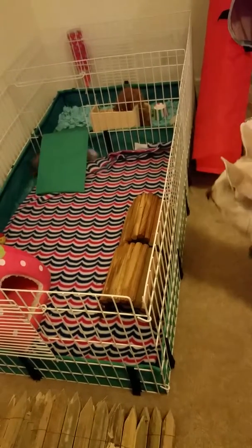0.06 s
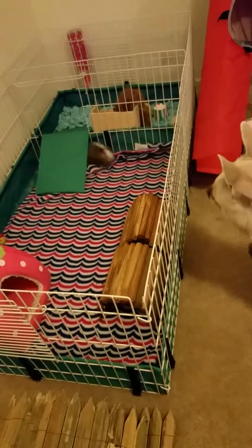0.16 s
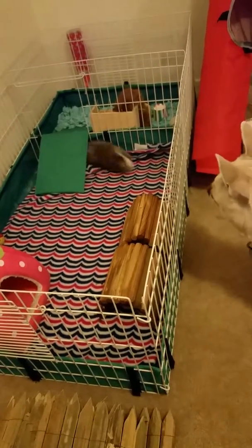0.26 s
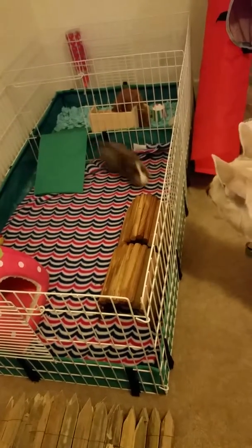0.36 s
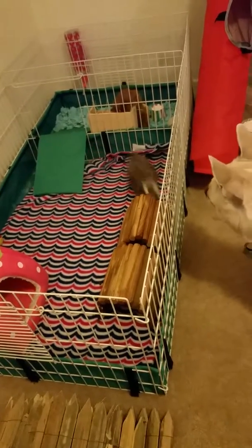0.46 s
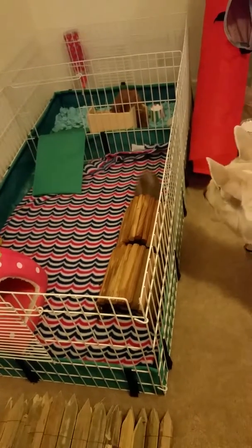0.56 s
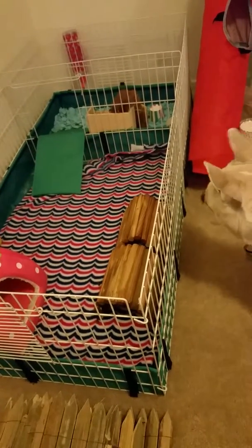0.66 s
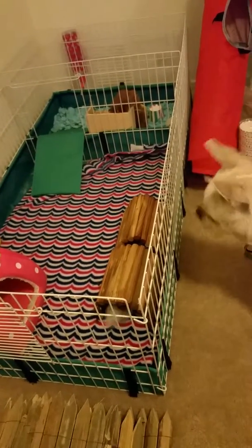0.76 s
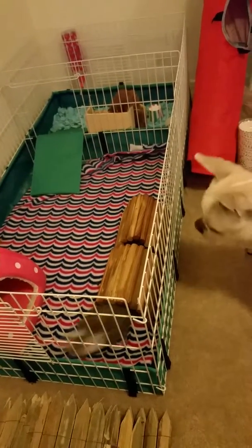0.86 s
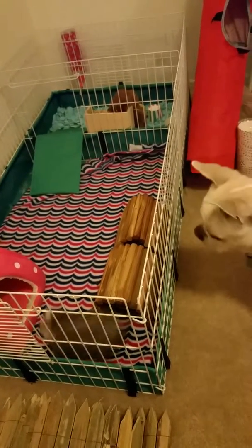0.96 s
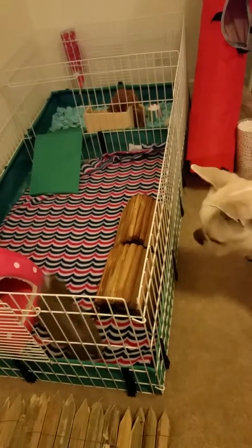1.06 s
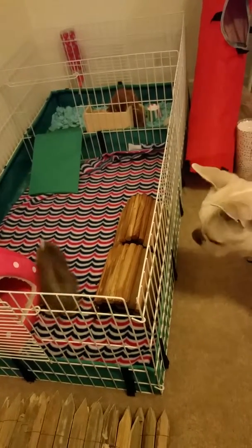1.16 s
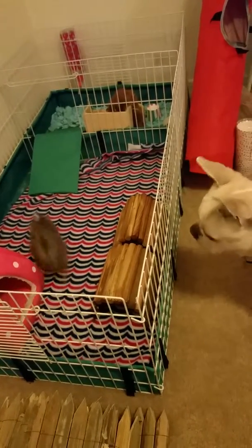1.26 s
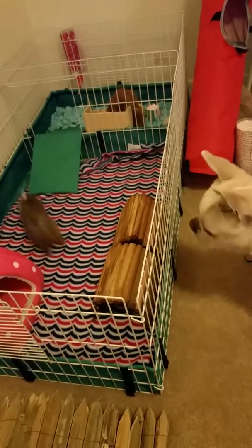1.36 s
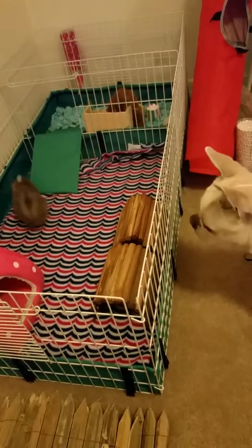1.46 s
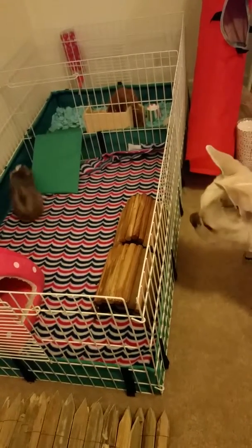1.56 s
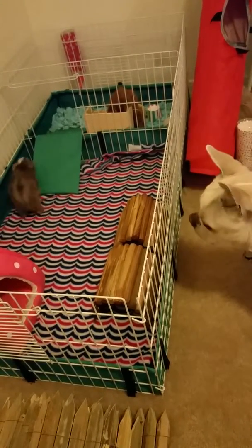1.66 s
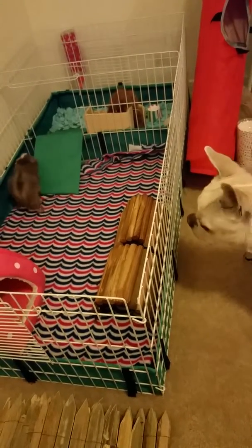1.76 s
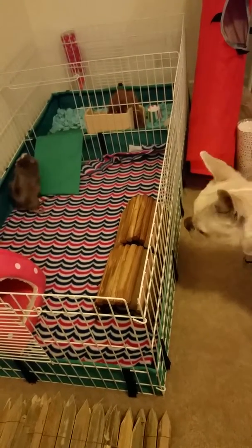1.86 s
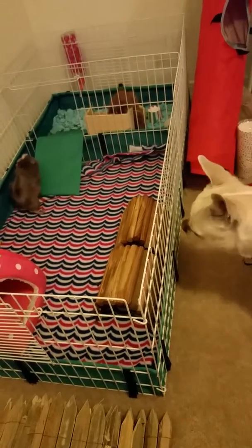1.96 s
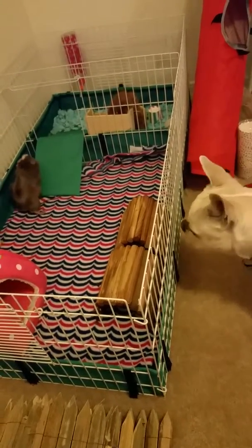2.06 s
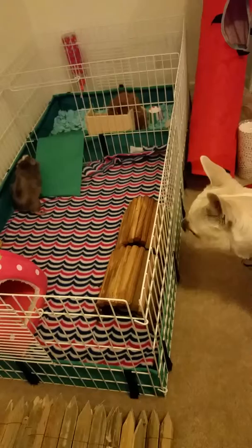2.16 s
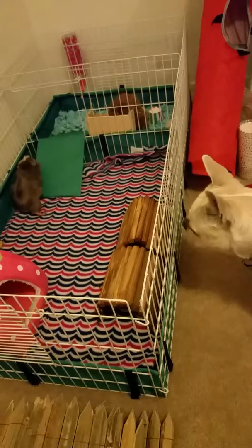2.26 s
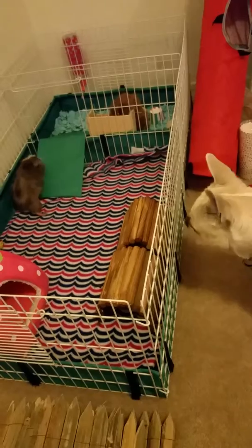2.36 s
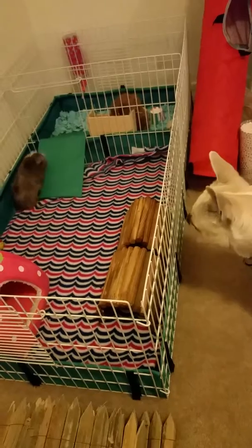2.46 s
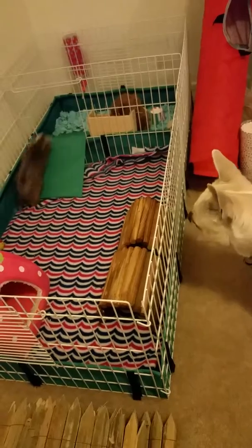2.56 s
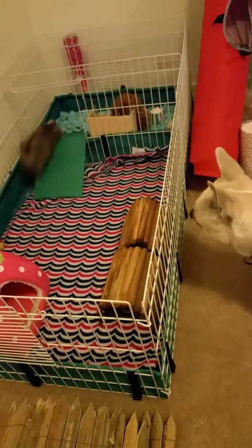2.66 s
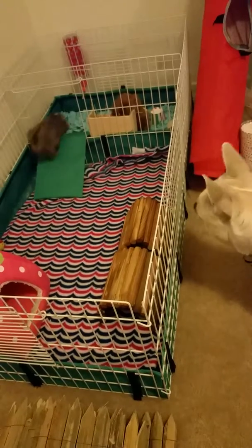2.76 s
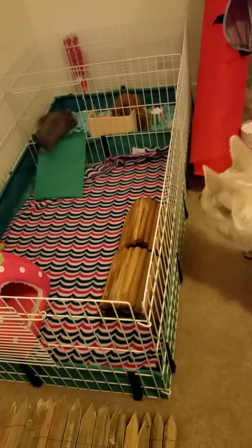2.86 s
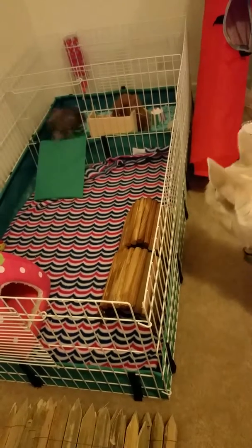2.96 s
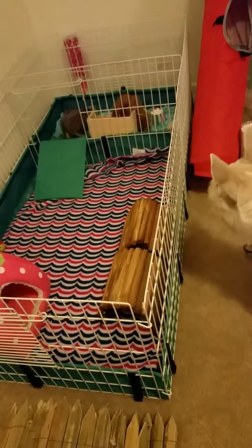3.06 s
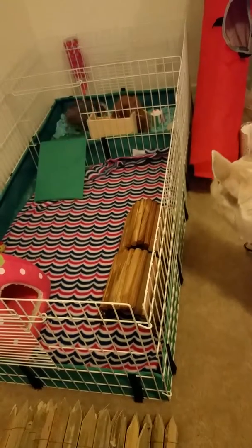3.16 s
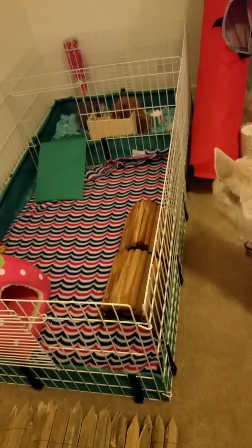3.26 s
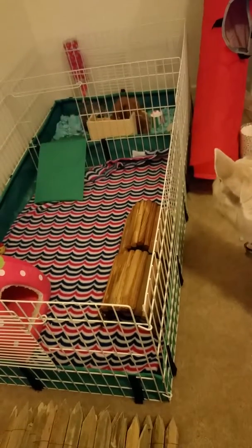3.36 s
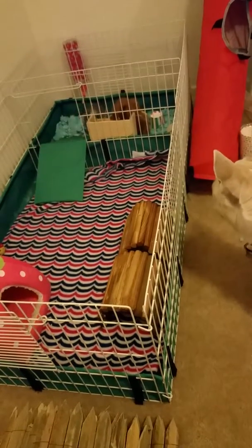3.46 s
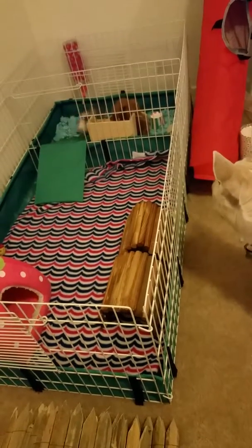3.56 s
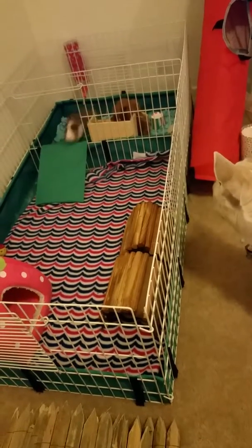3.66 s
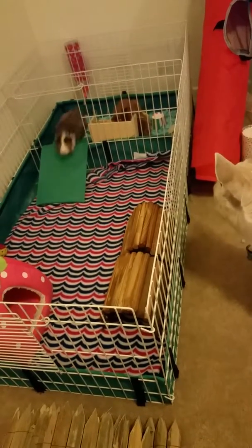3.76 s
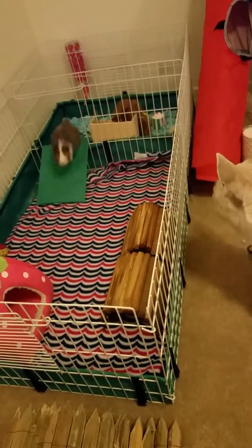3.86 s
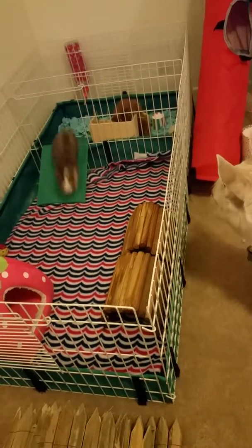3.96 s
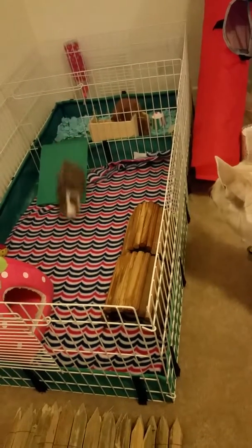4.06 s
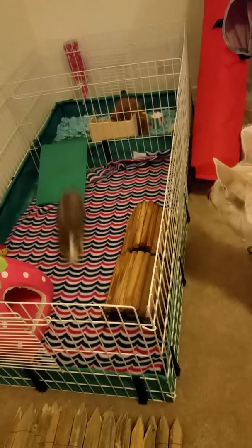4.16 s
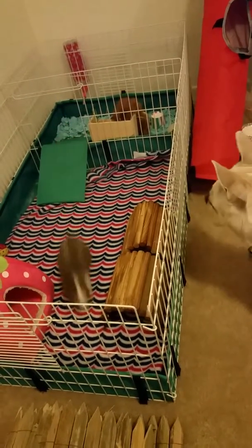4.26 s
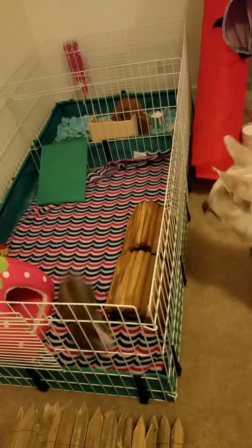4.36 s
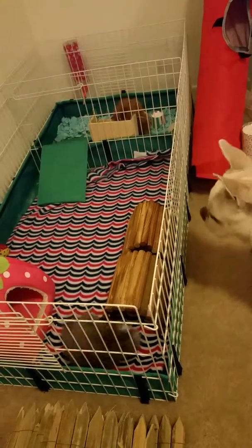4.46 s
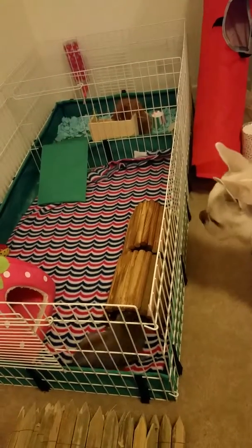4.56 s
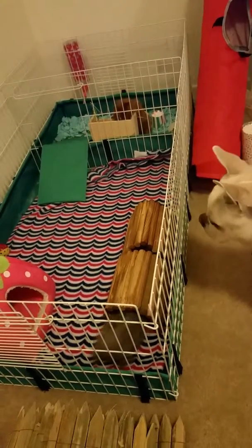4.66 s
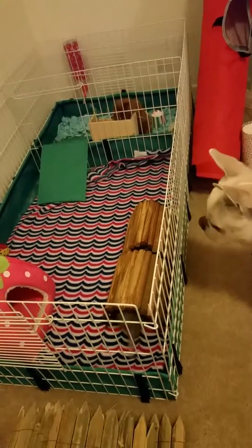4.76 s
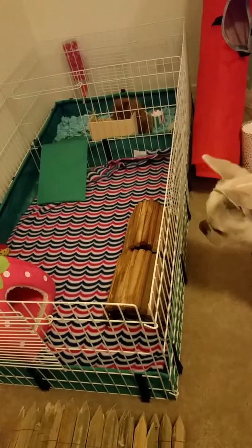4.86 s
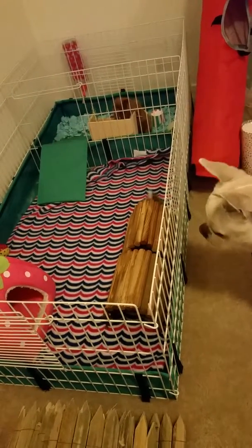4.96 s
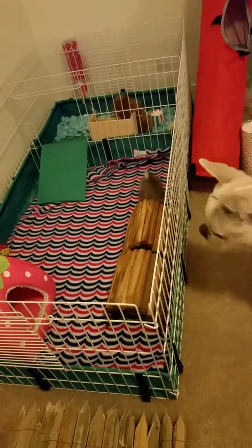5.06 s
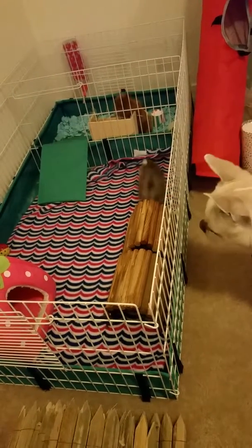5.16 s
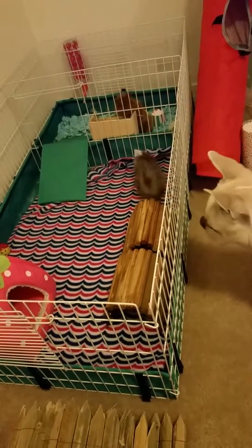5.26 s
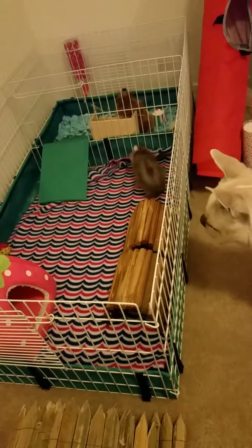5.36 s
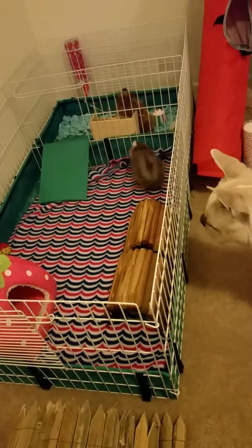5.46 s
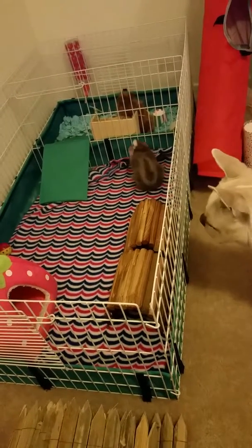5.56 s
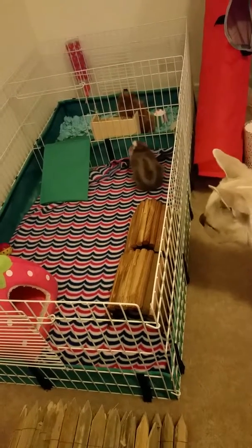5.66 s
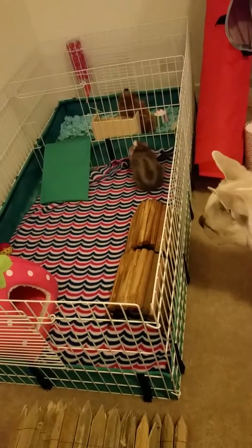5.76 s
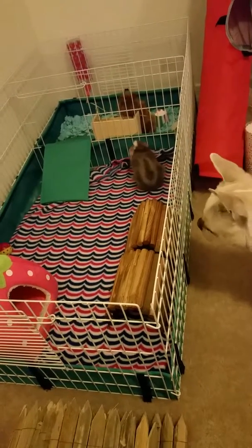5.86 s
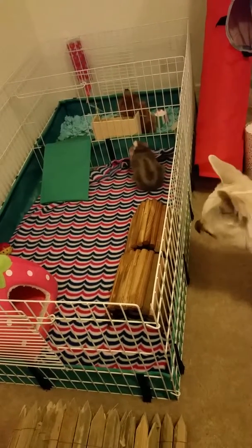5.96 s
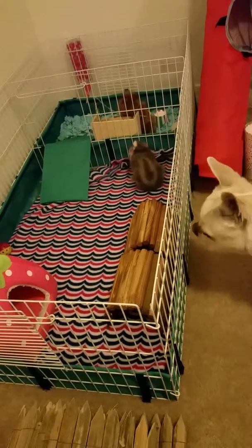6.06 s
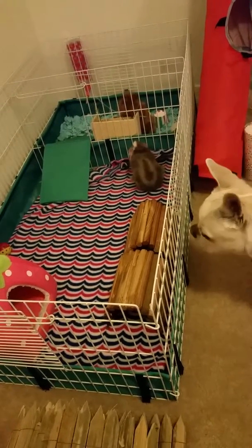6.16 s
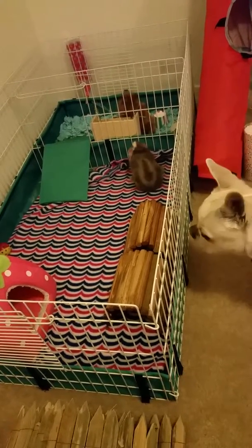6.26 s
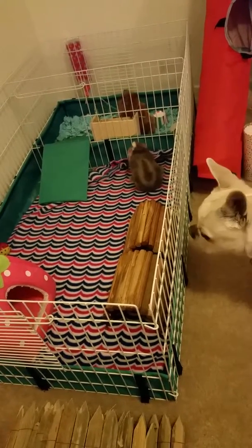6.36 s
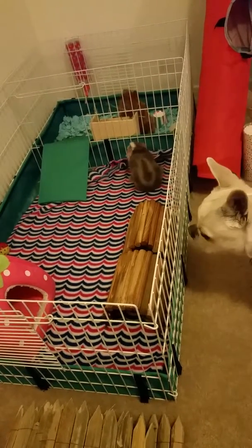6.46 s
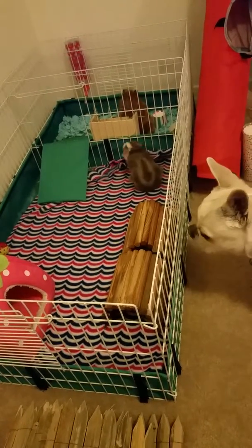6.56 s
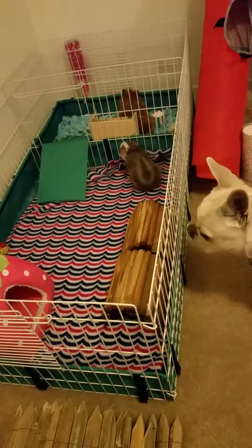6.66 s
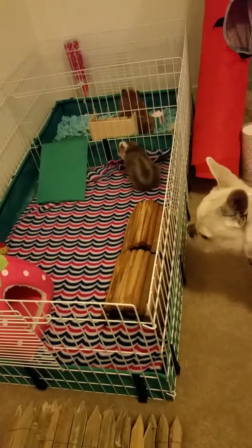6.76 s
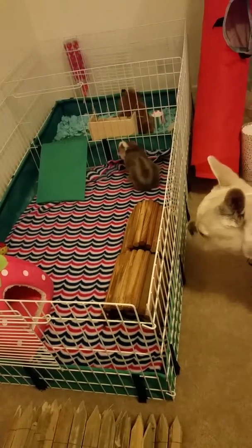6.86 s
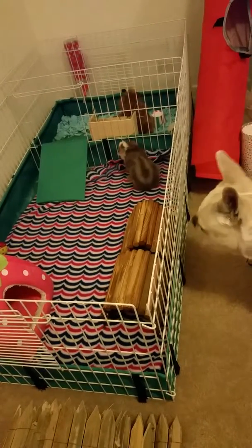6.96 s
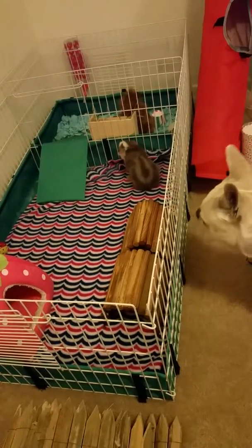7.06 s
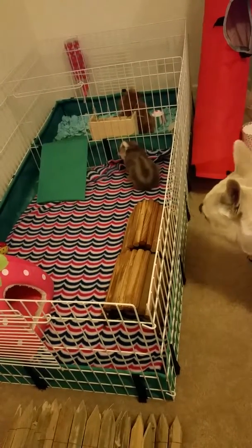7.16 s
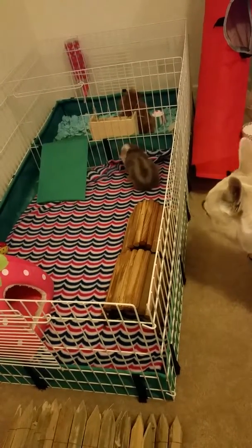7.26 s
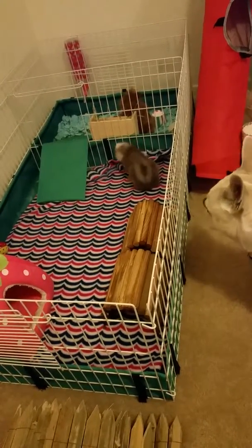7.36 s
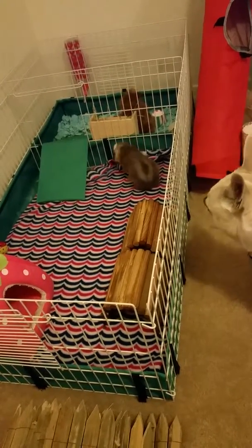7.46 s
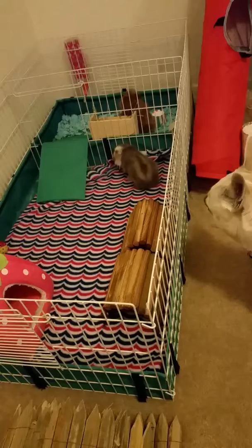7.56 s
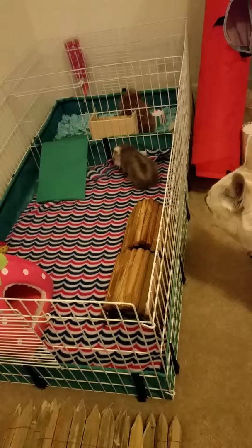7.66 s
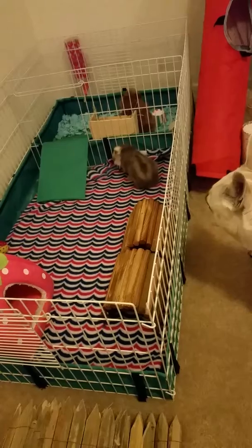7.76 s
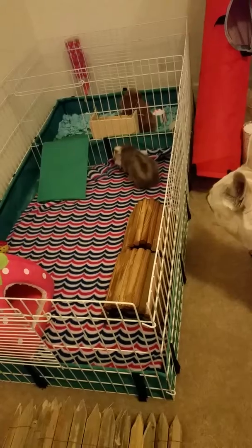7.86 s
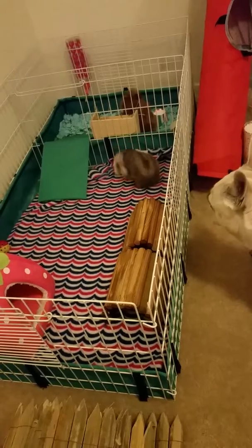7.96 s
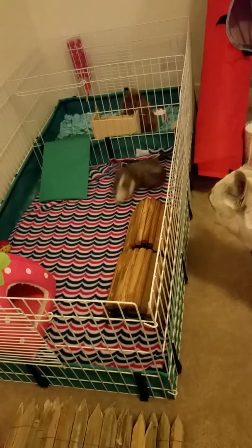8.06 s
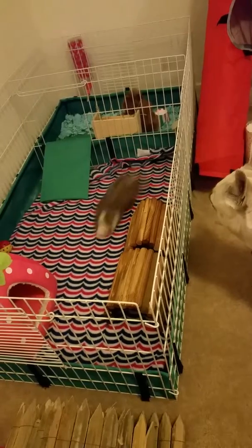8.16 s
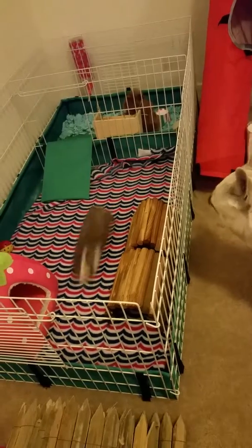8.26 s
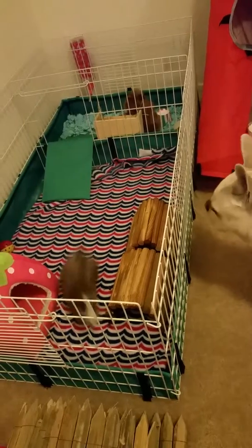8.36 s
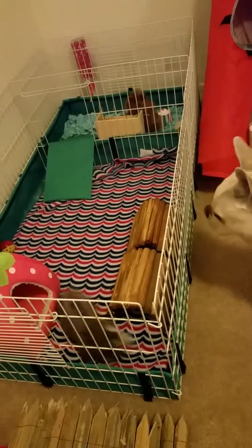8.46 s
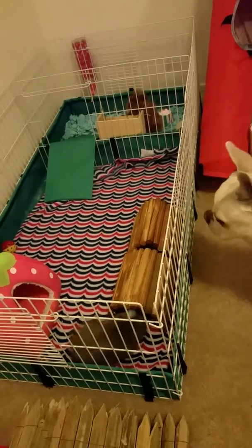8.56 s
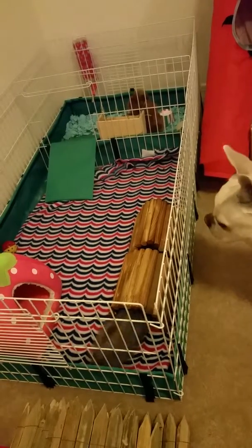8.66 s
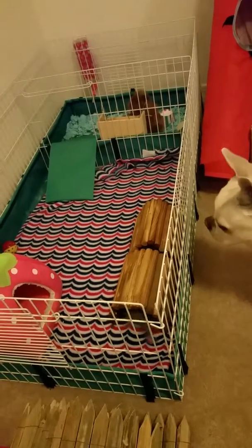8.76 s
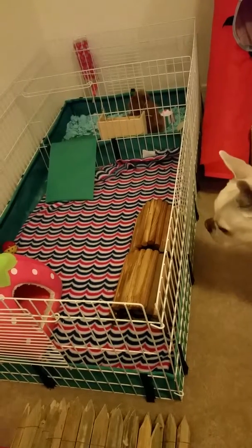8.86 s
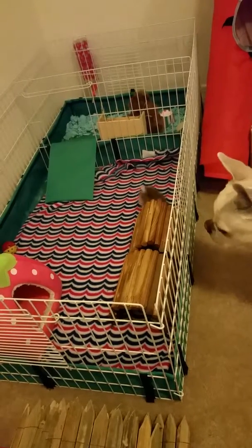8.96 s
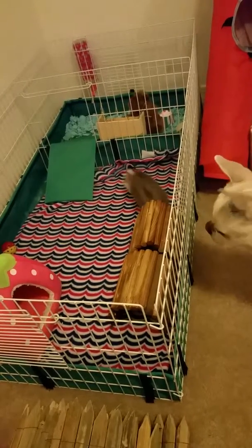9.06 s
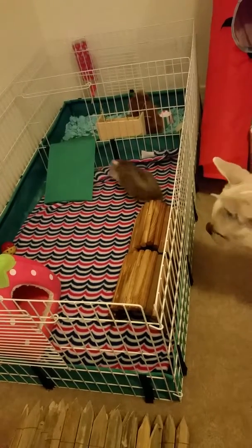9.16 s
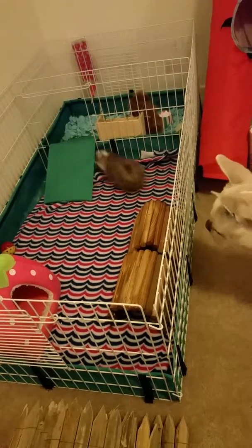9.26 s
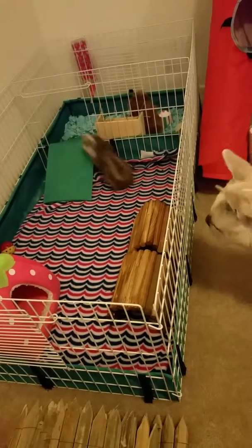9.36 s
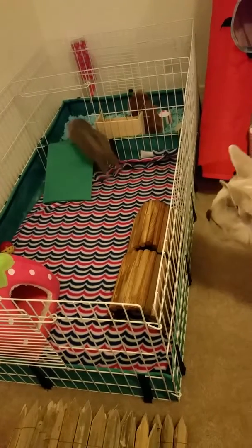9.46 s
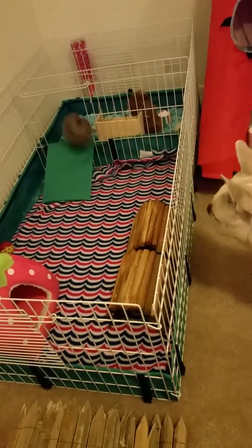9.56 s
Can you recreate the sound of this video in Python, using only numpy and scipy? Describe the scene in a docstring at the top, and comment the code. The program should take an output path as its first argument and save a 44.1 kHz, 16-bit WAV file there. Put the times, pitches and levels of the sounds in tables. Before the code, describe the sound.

In a small carpeted room, a steady low ventilation hum with a very faint high hiss runs throughout. From 0 to 1.5 seconds a guinea pig scampers around its cage: quick muffled thuds on fleece, hollow plastic knocks, dry scratches and claw ticks. Around 1.5 to 1.7 it brushes the wire, with thin pings and a slight rattle, then nearly stops until 2.6. From 2.6 to 4.6 comes the busiest scramble, rasping feet and loud hollow knocks on tray and ramp, densest near 3.1 and 4.1 to 4.3, with a small hard clink at 3.4. A crisp double wire snap hits near 4.67. Soft steps fade by 5.2; a rest follows, with only faint rustles and ticks. At 8.1 it bolts again, softer thuds and knocks, a brief rattle at 8.67, and another thump at 9.4 before the end at about 9.6.

```python
"""A small carpeted room with a wire cage: a guinea pig runs laps, with a long rest in between.
Impacts excite damped modes: paws patter and thud on the fleece and knock on the plastic tray and ramp;
claws tick, wire bars ring, rattle and snap, and something hard clinks in the feeding corner.
Friction is clumped random slips, filtered into fur brushing, slipping feet, scratches and rustles of hay.
Filtered noise makes the steady ventilation hum behind it all, and a separate faint, narrow high hiss."""
import sys
import numpy as np
from scipy import signal
from scipy.fft import rfft, irfft, next_fast_len
from scipy.io import wavfile

SR = 44100
rng = np.random.default_rng(int(sys.argv[2]) if len(sys.argv) > 2 else 0)


def wav_out(sig):
    """Save sig, one row per channel (or a flat mono array), as 16-bit PCM at SR to the path in sys.argv[1]."""
    wavfile.write(sys.argv[1], SR, np.round(np.clip(np.atleast_2d(sig).T, -1, 1) * 32767).astype(np.int16))


N = 422919

# Levels in the tables are relative: each source's mix gain, room and stereo balance follow.
# spectrum of the steady broadband background: [f/Hz, level/dB]
AIR_SPECTRUM = [(19, -34), (29, -5.5), (42, -1.5), (62, 0), (90, -5), (125, -0.5), (180, -11.5), (270, -8),
                (400, -18), (490, -16), (700, -25), (1400, -31), (6000, -40), (15500, -40.5)]
AIR_DB = -56
# low drone and a separate faint high hiss: [f/Hz, half-width/Hz, rms level/dB]
DRONE_AND_HISS_BANDS = [(129, 6, -56.5), (145.8, 11.4, -60), (223.6, 6.9, -65.5), (8600, 340, -86)]
# effort of the animal, two laps, a rest, one more lap: [t/s, level/dB]
EFFORT_CURVE = [(0, 9), (0.3, 2.5), (0.55, 0), (1.4, -3.5), (1.8, -17), (1.95, -13), (2.55, -8),
                (2.9, -0.5), (3.8, 1.5), (4.45, -1.5), (4.7, -3.5), (5.6, -8.5), (6.3, -14.5),
                (7.95, -15.5), (8.3, -2), (8.9, -6.5), (9.2, -7), (9.59, -5)]
# feet slipping: [start t/s, length/s, panel rasp level/dB, claw hiss level/dB]
FOOT_SLIPS = [(0.028, 0.0091, -42, -54), (0.087, 0.045, -66, -56), (0.155, 0.064, -52.5, -76),
              (0.27, 0.033, -52.5, -59.5), (0.385, 0.006, -44.5, -59.5), (0.568, 0.024, -58, -58),
              (0.926, .012, -53, -58.5), (1.091, 0.0044, -53.5, -57), (1.253, 0.025, -53.5, -59),
              (1.496, 0.043, -82, -64), (1.619, 0.035, -72, -59.5), (1.695, 0.11, -65, -65.5),
              (1.792, 0.06, -63.5, -63.5), (2.594, 0.071, -58, -56), (2.699, 0.021, -46.5, -58.5),
              (2.836, 0.041, -51, -53), (2.88, 0.031, -59, -53.5), (2.915, 0.026, -43.5, -56),
              (2.962, 0.062, -53, -53.5), (3.04, 0.15, -44.5, -49), (3.102, 0.015, -43, -46),
              (3.118, 0.03, -47.5, -64), (3.312, 0.023, -49.5, -59), (3.416, 0.051, -54.5, -64),
              (3.534, 0.041, -51.5, -60), (3.718, 0.014, -55, -59.5), (3.798, 0.03, -48, -66),
              (3.907, 0.048, -42.5, -53), (3.962, 0.1, -53, -46.5), (4.073, 0.006, -43.5, -61),
              (4.104, .012, -46.5, -57), (4.151, 0.023, -40.5, -45.5), (4.243, 0.029, -48.5, -53),
              (4.281, 0.032, -46, -48), (4.457, 0.024, -47.5, -66), (4.581, 0.009, -55.5, -52.5),
              (4.794, 0.025, -55, -61.5), (5.439, .008, -78, -69.5), (7.468, 0.085, -69, -67.5),
              (8.134, 0.025, -53, -67), (8.199, 0.008, -58.5, -72), (8.283, 0.037, -58, -80),
              (8.455, 0.025, -58, -84), (8.67, 0.015, -54.5, -50.5), (8.692, 0.093, -60.5, -63.5),
              (8.829, 0.044, -58, -76), (9.561, 0.022, -61, -65)]
# spectra of the panel's rasp and the claws' hiss: [f/Hz, level/dB]
RASP_SPECTRUM = [(200, -1), (310, 7.5), (420, 2), (560, -4), (720, 1), (920, -2.5), (1080, -4),
                 (1550, -14.5), (2000, -11), (2650, -9.5), (3400, -21.5), (6000, -30.5)]
HISS_SPECTRUM = [(1500, -7), (2600, -4), (3800, -5), (4800, -7), (5800, -4.5), (7300, -8), (8400, -12.5),
                 (11500, -13.5), (15500, -17)]
# scratches, skids and squeaks, and faint high rustles of hay, each in its own band:
# [middle t/s, rms level/dB before the swell, Gaussian half length/s, centre f/Hz, half-width/octaves]
SCRATCHES_AND_RUSTLES = [(0.02, -59, .008, 950, 0.56), (0.102, -58, 0.0081, 3880, 0.45),
                         (0.1, -58, 0.016, 1200, .8), (0.128, -55.5, 0.004, 2500, 0.08),
                         (0.146, -58, .008, 3200, .12), (0.215, -63.5, 0.033, 3050, .12),
                         (0.2, -71, 0.044, 6000, 0.29), (0.308, -65, .025, 1500, 0.7),
                         (0.35, -66.5, .045, 5900, .25), (0.68, -78, 0.012, 4000, .6),
                         (0.775, -68, .01, 1500, .5), (0.856, -71.5, 0.044, 2650, 0.089),
                         (1.012, -74, .014, 6200, .4), (1.237, -67, 0.0087, 5000, .7),
                         (1.528, -66, .008, 5500, 0.77), (1.53, -63, .005, 2650, .06),
                         (1.55, -61.5, .003, 2650, .06), (1.565, -61, 0.0042, 2630, .06),
                         (1.584, -73, 0.027, 6000, .35), (1.653, -62, .012, 2620, .07),
                         (1.77, -67, .02, 2630, .07), (2.147, -66.5, .005, 2670, 0.087),
                         (2.148, -64.5, 0.0046, 4170, 0.12), (2.422, -63, 0.0016, 8000, 0.36),
                         (2.624, -56.5, 0.012, 2200, 1.5), (2.623, -61, .012, 6150, 0.22),
                         (2.692, -61, .008, 4500, 1), (2.728, -57, 0.0072, 1900, 1.3),
                         (2.855, -57, .01, 1700, .8), (2.9, -49.5, 0.0079, 1700, 0.55),
                         (2.9, -57, 0.018, 4140, 0.39), (2.93, -50, 0.012, 754, 0.71),
                         (2.983, -58, 0.025, 6460, 0.3), (3, -52.5, 0.039, 1600, 1.1),
                         (3.207, -59.5, 0.023, 2190, 1), (3.105, -42, 0.0031, 4900, 0.36),
                         (3.12, -45, 0.019, 3300, 0.99), (3.46, -66, .012, 6000, .4),
                         (3.788, -70, 0.019, 4200, 1), (3.956, -49.5, 0.011, 4800, 0.41),
                         (3.98, -51, 0.065, 1700, 1.15), (4.021, -52, 0.029, 5800, 0.2),
                         (4.274, -55, 0.013, 1900, .8), (4.31, -57, 0.0099, 3280, 0.72),
                         (4.33, -53, 0.023, 895, 1.1), (4.527, -66.5, 0.016, 3800, .7),
                         (4.594, -48, 0.0059, 5200, 0.8), (4.603, -57, .007, 3100, .55),
                         (4.815, -64.5, 0.0082, 1490, 1), (4.9, -73, .014, 3200, 1),
                         (4.99, -72, .014, 1100, .5), (5.125, -70, 0.027, 1980, 0.38),
                         (5.15, -60.5, 0.013, 11500, 0.97), (5.447, -68, 0.0065, 2550, 0.14),
                         (5.943, -74, .015, 3970, 1.3), (6.107, -66.5, .007, 3840, .05),
                         (6.11, -66.5, 0.02, 13000, 0.5), (6.402, -70, 0.032, 13500, .45),
                         (7.209, -68, .004, 11500, .6), (8.077, -72, .01, 2000, 1.1),
                         (8.688, -63, 0.011, 1800, 0.89), (8.74, -66.5, 0.025, 5840, .3),
                         (8.84, -71, .02, 3500, 0.87), (8.983, -71, .015, 11000, .8),
                         (9.23, -71.5, 0.023, 2700, .2), (9.573, -63.5, 0.0059, 2680, .2)]
# heavy landings on the padded floor: [t/s, peak level/dB, centre f/Hz]
FLOOR_THUDS = [(0.03, -37.5, 239), (0.099, -40, 105), (0.154, -40, 230), (0.206, -34.5, 204),
               (0.24, -39, 110), (0.281, -34, 310), (0.292, -36, 106), (0.381, -34, 102),
               (0.409, -40.5, 108), (0.47, -42, 200), (0.538, -35.5, 112), (0.793, -41.5, 110),
               (0.935, -44, 120), (1.156, -32, 149), (1.259, -39.5, 169), (1.331, -36.5, 132),
               (1.384, -36.5, 132), (1.56, -50, 249), (1.642, -42.5, 248), (2.62, -36, 246),
               (2.635, -46, 117), (2.675, -40, 121), (2.718, -42.5, 300), (2.853, -40.5, 260),
               (2.876, -46, 135), (2.921, -37.5, 280), (3.083, -40.5, 368), (3.108, -37, 152),
               (3.137, -34.5, 290), (3.165, -40, 294), (3.185, -44, 166), (3.313, -41, 145),
               (3.58, -37, 126), (3.675, -44, 131), (3.735, -38, 285), (3.919, -34.5, 327),
               (4.015, -41.5, 136), (4.045, -39, 145), (4.115, -40, 290), (4.167, -31.5, 243),
               (4.186, -32.5, 124), (4.242, -39.5, 332), (4.254, -36.5, 206), (4.272, -37.5, 115),
               (4.309, -40, 170), (4.357, -33.5, 213), (4.425, -38, 109), (4.456, -34, 135),
               (4.484, -36, 106), (4.584, -42, 262), (4.598, -41, 122), (4.863, -40, 125),
               (4.905, -39.5, 130), (5.02, -40.5, 130), (5.079, -37, 135), (5.154, -40.5, 137),
               (8.141, -43.5, 225), (8.197, -39, 130), (8.225, -41.5, 302), (8.262, -40, 120),
               (8.296, -35, 136), (8.326, -32.5, 212), (8.388, -32.5, 127), (8.424, -37.5, 145),
               (8.735, -38.5, 151), (8.858, -42, 216), (8.909, -38.5, 94.5), (9.285, -42, 190),
               (9.414, -32, 131.4)]
# hard knocks on the plastic tray and ramp: [t/s, peak level/dB, centre f/Hz]
TRAY_KNOCKS = [(0.0335, -31, 1130), (0.046, -43, 1100), (0.078, -49, 950), (0.205, -49, 875),
               (0.262, -44.5, 1460), (0.28, -44, 700), (0.374, -56, 820), (0.393, -39, 1590),
               (0.401, -48, 900), (0.47, -50, 890), (0.668, -48.5, 730), (0.794, -48.5, 1240),
               (0.931, -54, 840), (0.95, -50, 800), (1.005, -45, 810), (1.258, -50, 790),
               (1.395, -53, 1300), (1.408, -49, 900), (1.708, -40, 1200), (1.722, -52, 1500),
               (1.732, -55, 1900), (1.82, -56, 1500), (1.831, -55, 2000), (2.616, -50, 1730),
               (2.658, -54, 870), (2.715, -35, 830), (2.716, -45, 2050), (2.846, -45, 1100),
               (2.879, -37, 1610), (2.895, -40, 1400), (2.92, -43.5, 640), (2.933, -41.5, 670),
               (3.003, -41, 1210), (3.015, -52, 820), (3.124, -42, 940), (3.131, -35, 920),
               (3.142, -33.5, 1300), (3.161, -38.5, 930), (3.19, -50, 643), (3.317, -59, 900),
               (3.329, -53, 790), (3.405, -45, 1210), (3.455, -46, 690), (3.723, -51, 800),
               (3.738, -49, 1000), (3.789, -48, 1200), (3.811, -45, 790), (4.07, -30, 1460),
               (4.082, -38, 810), (4.101, -34, 1100), (4.118, -46, 820), (4.168, -28, 1560),
               (4.243, -44, 1340), (4.317, -38, 720), (4.743, -53.5, 650), (4.987, -53.5, 755),
               (5.004, -55, 890), (5.064, -51, 840), (8.139, -48, 730), (8.154, -54, 950),
               (8.169, -56, 1700), (8.201, -51, 1900), (8.271, -56, 2300), (8.293, -48.5, 800),
               (8.318, -47, 990), (8.394, -51.5, 760), (8.423, -53, 1510), (8.456, -43.5, 790),
               (8.473, -45, 745), (8.723, -51, 950), (8.846, -59, 900), (8.902, -53, 645),
               (9.015, -51, 885), (9.03, -51, 940), (9.277, -57, 800), (9.305, -55, 850),
               (9.356, -52.5, 930), (9.564, -50.5, 1720)]
# claws ticking on hard edges: [t/s, peak level/dB, centre f/Hz]
CLAW_TICKS = [(0.037, -39.5, 3700), (0.085, -53, 3500), (0.096, -48, 3700), (0.111, -44, 4300),
              (0.2625, -37.5, 7900), (0.3311, -48, 6450), (0.349, -48, 6100), (0.9304, -56, 5810),
              (1.0928, -45, 3100), (1.0935, -43, 6330), (1.097, -46, 6000), (1.1927, -59, 3640),
              (2.606, -53, 3100), (2.616, -48, 3600), (2.6252, -44.5, 4800), (2.633, -47, 3800),
              (2.6576, -50, 5560), (2.682, -54, 2800), (2.7152, -44, 4320), (2.8797, -44, 3700),
              (2.897, -50, 3800), (2.922, -48, 3600), (3.071, -54, 2600), (3.1045, -38, 5000),
              (3.107, -36, 4700), (3.7234, -53, 5740), (3.8104, -50.5, 3930), (3.935, -47, 2800),
              (4.046, -43, 3300), (4.0696, -39, 3770), (4.101, -48, 3200), (4.1606, -36, 3900),
              (4.1695, -39, 6400), (4.195, -47, 2600), (4.2423, -44.5, 5500), (4.262, -49, 3000),
              (4.312, -46, 3200), (4.584, -48, 5150), (4.598, -50, 4200), (5.108, -54.5, 7200),
              (5.439, -59, 2700), (6.0576, -59, 8400), (7.467, -57, 6500), (7.492, -55.5, 6000),
              (7.548, -58.5, 3000), (7.71, -61, 4200), (7.856, -61, 8700), (8.169, -60, 3200),
              (8.202, -57, 3160), (8.672, -44, 5410), (9.3553, -50.5, 8000)]
# nudges of the cage bars: [t/s, peak level/dB, centre f/Hz]
BAR_NUDGES = [(1.52, -55, 2640), (1.5566, -47.5, 4150), (1.56, -55, 2630), (1.633, -50, 5400),
              (1.645, -49, 5400), (1.655, -47, 7340), (1.658, -62, 5400), (9.3544, -49, 5700)]
# a bumped panel chattering against its clips: [t/s, first peak level/dB, centre f/Hz]
PANEL_RATTLES = [(1.628, -54, 6200), (4.583, -49, 4800), (4.802, -59, 6700), (8.674, -55, 6200)]
# something hard in the feeding corner: [t/s, peak level/dB, centre f/Hz]
CORNER_CLINKS = [(3.406, -45, 1300), (3.411, -50, 1300)]
# a wire snapping twice against its clip, each with a close early reflection:
# [t/s, peak level/dB, centre f/Hz]
WIRE_SNAPS = [(4.6587, -32, 6800), (4.6605, -37, 6800), (4.678, -35, 6900), (4.6797, -36.5, 6800)]
# natural modes of each struck body: [f/Hz, level/dB, t60/s]
FLOOR_RESONANCES = [(79, -31, 0.044), (114, -10, 0.16), (136.8, -5, 0.14), (177, 0, 0.063),
                    (221.3, 1.5, 0.1), (257, -7.5, 0.092), (298.5, 1.5, 0.074), (366.7, -3, 0.11),
                    (447, -11.5, 0.07)]
TRAY_RESONANCES = [(478, 4, 0.032), (638, 3.5, 0.05), (755, -15, 0.043), (817, 1.5, 0.094),
                   (934, -1, 0.084), (1087, -2.5, 0.08), (1290, 4.5, 0.049), (1404, 5, 0.033),
                   (1560, 8.5, 0.021), (1780, -3.5, 0.025), (2260, 3, 0.055), (2580, 2, 0.033),
                   (3260, -25, 0.058)]
CLAW_RESONANCES = [(2810, -4, 0.0085), (3980, -13, 0.014), (5800, -4, 0.014), (6820, 8, 0.0058),
                   (7220, 12.5, 0.0085), (9700, 13.5, 0.0048), (11400, 9, 0.0031), (13700, 12, 0.004)]
BAR_RESONANCES = [(2600, -3, 0.076), (2630, 0, 0.042), (3990, 0, 0.045), (4500, -10, .05),
                  (5520, -5, 0.066), (5680, -11, 0.038), (6850, -11, 0.054), (7180, -2, 0.042),
                  (8800, -13, 0.055), (9060, -9, .04)]
CLINK_RESONANCES = [(1080, -4, .04), (1430, -5, 0.07), (1980, -7, .11), (2900, -7, .02),
                    (3754, -1.5, 0.047), (4250, 1, 0.018), (6595, -16, .04), (7370, -5, .025)]
SNAP_RESONANCES = [(4650, -12, 0.0025), (5880, -9.5, 0.003), (7100, -6, 0.0035), (10450, 0.5, 0.001),
                   (13500, -4, 0.0012)]
# left-right correlation of diffuse sound: [f/Hz, correlation]
STEREO_LIKENESS = [(60, 0.98), (130, 0.98), (290, 0.93), (640, 0.22), (1400, 0), (15000, 0)]
# reverberation time of the room: [f/Hz, t60/s]
ROOM_DECAY = [(150, 0.33), (600, 0.26), (3000, 0.31), (8000, 0.14), (15000, 0.22)]
# stereo balance of the cage: [f/Hz, left minus right level/dB]
CAGE_LEAN = [(110, -1), (200, 0.5), (360, -7), (680, 2.5), (1300, -2), (2400, 0), (4400, -4), (8000, 0),
             (15000, 1.5)]

# fur brushing and light steps, relative levels at effort 0 dB
BRUSH_RASP_DB, BRUSH_HISS_DB = -62.5, -70.5
STEPS_PER_S, STEP_JITTER_SHARE = 11, .25   # jitter as a share of the mean interval
STEP_SCATTER_DB, STEP_SPREAD_OCTAVES = 3, 0.445
STEP_THUD_DB, STEP_KNOCK_DB = -45, -56.5
STEP_THUD_HZ, STEP_KNOCK_HZ = 175.3, 850
# a slipping foot bites over the first share of its slide, then slows and dies away
SCUFF_ATTACK_SHARE, SCUFF_SAG_DB_PER_S, SCUFF_RELEASE_S = 0.32, 26, 0.032
RATTLE_GAP_S, RATTLE_SAG_DB_PER_S = .009, 156   # mean gap
RATTLE_SCATTER_DB, RATTLE_SPREAD_OCTAVES = 2, 0.44
SNAP_LOW_CUT_HZ, CUTOFF_HZ = 4200, 15900
NEAR_CORNER_PAN_DB = -4   # left minus right, for claws and bars, ahead of the cage's lean
DECAY_60_DB = np.log(1000)   # exponent of a fall by 60 dB


def from_db(db):
    """Level to amplitude: a factor of ten per 20 dB."""
    return 10 ** (np.asarray(db) / 20)


def rms_one(x):
    """Normalisation by power: scale to rms 1."""
    return x / np.sqrt(np.mean(x ** 2) + 1e-20)


def at_hz(points, hz):
    """Interpolation along a logarithmic frequency axis."""
    freqs, values = np.transpose(points)
    return np.interp(np.log(np.maximum(hz, 1)), np.log(freqs), values)


def bins(size):
    """Discrete Fourier frequencies, in Hz, for this many samples."""
    return np.arange(size // 2 + 1) * SR / size


def left_right(difference_db):
    """Intensity stereo: share a left-minus-right level difference between two gains."""
    return from_db(difference_db * np.array([[.5], [-.5]]))


def drift(rate):
    """Slow random modulation: chance values, rate per second, joined by lines; rms 1."""
    knots = rng.standard_normal(int(N / SR * rate) + 2)
    return rms_one(np.interp(np.arange(N) / SR * rate, np.arange(len(knots)), knots))


def diffuse(pair, gain_at):
    """Diffuse-field correlation: filter two unrelated signals and mix them, alike in the bass only; rms 1."""
    length = pair.shape[1]
    size = next_fast_len(length)
    hz = bins(size)
    mid, side = rfft(pair, size) * gain_at(hz)
    alike = np.clip(at_hz(STEREO_LIKENESS, hz), -.99, .995)
    spectrum = np.sqrt(1 + alike) * mid + np.sqrt(1 - alike) * side * [[1], [-1]]
    return rms_one(irfft(spectrum, size)[:, :length])


def room(x, wet_db, early_db, early_s):
    """Reverberation: direct sound, cage and wall reflections, then a short tail decaying by band."""
    t = np.arange(SR // 2) / SR
    noise = diffuse(rng.standard_normal((2, len(t))), np.ones_like)
    edges = np.geomspace(50, 17000, 9)
    tail = 0
    for low, high in zip(edges, edges[1:]):
        inside = (bins(len(t)) >= low) & (bins(len(t)) < high)
        t60 = at_hz(ROOM_DECAY, np.sqrt(low * high))
        tail = tail + irfft(rfft(noise) * inside, len(t)) * np.exp(-DECAY_60_DB * t / t60)
    tail = tail * (1 - np.exp(-t / 0.0073))   # gradual build-up
    early = diffuse(rng.standard_normal((2, len(t))), np.ones_like) * np.exp(-t / early_s)
    echoes = from_db(wet_db) * rms_one(tail) + from_db(early_db) * rms_one(early)
    echoes = echoes / np.sqrt(len(t))
    return x + signal.fftconvolve(np.atleast_2d(x), echoes, axes=1)[:, :N]


def blows(rows, modes, focus_db, scatter_db, contact_s, spread, ring_db, cycles):
    """Modal excitation: a short pulse plus damped modes, strongest near its pitch; stereo phases differ."""
    t = np.arange(SR // 4) / SR
    hz, level_db, t60 = np.transpose(modes)
    decays = np.exp(-DECAY_60_DB * t / t60[:, None])
    out = np.zeros((2, N + len(t)))
    for (s, peak_db, centre_hz), chance in zip(rows, rng.standard_normal((len(rows), 3, len(hz)))):
        detuning_db = focus_db * np.abs(np.log2(hz / centre_hz))   # focus in dB per octave
        strength = from_db(level_db - detuning_db + scatter_db * chance[0])
        phase = 2 * np.pi * hz[:, None] * t + spread * chance[1:, :, None]   # spread in radians
        ring = (strength[:, None] * decays * np.sin(phase)).sum(axis=1)
        pulse = np.sin(2 * np.pi * centre_hz * t + spread * chance[1:, :1] / 2)
        pulse = pulse * np.exp(-DECAY_60_DB * t * centre_hz / cycles)   # falls 60 dB in so many cycles
        blow = pulse + from_db(ring_db) * ring / np.linalg.norm(strength)
        blow = blow * (1 - np.exp(-t / contact_s))
        start = max(round(s * SR), 0)
        out[:, start:start + len(t)] += from_db(peak_db) * blow / np.abs(blow).max(axis=1).mean()
    return out[:, :N]


def grains(per_s, size_db, clump_db, smooth_share):
    """Stick-slip friction: tiny slips of uneven size in clumps, over smooth noise."""
    born = rng.random(N) < per_s / SR
    sizes = from_db(size_db * np.minimum(rng.exponential(1, N), 3))
    slips = rms_one(born * sizes * rng.choice([-1, 1], (2, N)))
    return (slips + smooth_share * rng.standard_normal((2, N))) * from_db(clump_db * drift(130))


def effort_db(s):
    """Effort law: the animal's briskness, interpolated in dB at these times."""
    return np.interp(s, *np.transpose(EFFORT_CURVE))


def background_hum_and_hiss():
    """Noise filtering: room rumble and drone, plus a separate faint, narrow high hiss."""
    air = diffuse(rng.standard_normal((2, N)), lambda hz: from_db(at_hz(AIR_SPECTRUM, hz)))
    out = from_db(AIR_DB) * air
    for centre_hz, width_hz, level_db in DRONE_AND_HISS_BANDS:
        noise = rng.standard_normal((2, N))
        band = diffuse(noise, lambda hz: 1 / (1 + ((hz - centre_hz) / width_hz) ** 2))
        out += from_db(level_db) * band
    return out


def friction():
    """Power addition: brushing that follows the effort, plus attack, slide and release of each scuff."""
    now = np.arange(N) / SR
    power = from_db(effort_db(now) + np.array([[BRUSH_RASP_DB], [BRUSH_HISS_DB]])) ** 2
    for s, length_s, rasp_db, hiss_db in FOOT_SLIPS:
        span = slice(int(s * SR) + 1, int(s * SR) + SR // 2)
        t = now[span] - s
        attack = np.minimum(t / (SCUFF_ATTACK_SHARE * length_s), 1)
        sag = from_db(-SCUFF_SAG_DB_PER_S * t)
        release = np.exp(-np.maximum(t - length_s, 0) / SCUFF_RELEASE_S)
        power[:, span] += (from_db([[rasp_db], [hiss_db]]) * attack * sag * release) ** 2
    return np.sqrt(power)


def panel_colour(hz, peak_db):
    """Resonant radiation: the broad rasp of the plastic, with its modes standing out."""
    peaks = 0
    for mode_hz, db, t60 in TRAY_RESONANCES:
        detuning = np.pi * (hz - mode_hz) * t60 * 2 / DECAY_60_DB
        peaks = peaks + from_db(db + peak_db) / (1 + detuning ** 2)
    return from_db(at_hz(RASP_SPECTRUM, hz)) * (1 + peaks)


def wander(x, depth_db, rate, count):
    """Spectral modulation as feet move: narrow bands, count per octave, swell and fade in six sets."""
    size = next_fast_len(N)
    spectrum, out = rfft(x.astype(np.float32), size), 0
    band = count * np.log2(np.maximum(bins(size), 1))
    for k in range(6):   # every sixth band moves together
        share = np.clip(1 - np.abs((band - k + 3) % 6 - 3), 0, 1).astype(np.float32)
        out = out + irfft(spectrum * share, size)[:, :N] * from_db(depth_db * drift(rate))
    return rms_one(out)


def scrabbling():
    """Frictional excitation: brushing fur and slipping feet make panels rasp and the surface hiss."""
    rasp = grains(per_s=520, size_db=3.1, clump_db=1.8, smooth_share=.45)
    rasp = diffuse(rasp, lambda hz: panel_colour(hz, peak_db=-2.0))
    rasp = wander(rasp, depth_db=2.5, rate=60, count=5)
    hiss = grains(per_s=850, size_db=3.2, clump_db=1.8, smooth_share=.5)
    hiss = diffuse(hiss, lambda hz: from_db(at_hz(HISS_SPECTRUM, hz)))
    hiss = wander(hiss, depth_db=3.6, rate=50, count=9)
    rasp_gain, hiss_gain = friction()
    slide = from_db(-3.0) * rasp * rasp_gain + from_db(-1.5) * hiss * hiss_gain
    return room(slide, wet_db=-13, early_db=-5, early_s=0.003)


def scratches_and_rustles():
    """Band-filtered friction: each is a short swell of fine slips around its centre frequency."""
    t = np.arange(SR // 4) / SR
    middle, hz = t.mean(), np.maximum(bins(len(t)), 1)
    slips = grains(per_s=2800, size_db=2.5, clump_db=2.5, smooth_share=.4)
    out = np.zeros((2, N))
    for s, level_db, half_s, centre_hz, octaves in SCRATCHES_AND_RUSTLES:
        start = int(np.clip((s - middle) * SR, 0, N - len(t)))
        span = slice(start, start + len(t))
        colour = 1 / (1 + (np.abs(np.log2(hz / centre_hz)) / octaves) ** 3)
        band = rms_one(irfft(rfft(slips[:, span]) * colour, len(t)))
        swell = np.exp(-((t + start / SR - s) / half_s) ** 2 / 2)
        out[:, span] += from_db(level_db) * swell * band
    return out


def light_steps(level_db, centre_hz):
    """Jittered periodicity: an uneven patter as strong as the effort; rows t/s, peak level/dB, f/Hz."""
    beats = np.arange(1, int(N / SR * STEPS_PER_S))
    late, strong, high = rng.standard_normal((len(beats), 3)).T
    s = np.clip((beats + STEP_JITTER_SHARE * late) / STEPS_PER_S, 0, N / SR)
    peak_db = level_db + effort_db(s) + STEP_SCATTER_DB * strong
    pitch_hz = centre_hz * 2 ** (STEP_SPREAD_OCTAVES * high)   # each paw on a new spot
    return list(zip(s, peak_db, pitch_hz))


def floor_thuds():
    """Soft-contact impact: a slow onset through the fleece excites the low floor modes."""
    rows = FLOOR_THUDS + light_steps(STEP_THUD_DB, STEP_THUD_HZ)
    thuds = blows(rows, FLOOR_RESONANCES, focus_db=15, scatter_db=2, contact_s=.006,
                  spread=.11, ring_db=-2, cycles=9)
    return from_db(-3.0) * room(thuds, wet_db=-13.5, early_db=-11, early_s=0.008)


def tray_knocks():
    """Hard-contact impact: a quick onset on plastic gives a hollow knock from its modes."""
    rows = TRAY_KNOCKS + light_steps(STEP_KNOCK_DB, STEP_KNOCK_HZ)
    knocks = blows(rows, TRAY_RESONANCES, focus_db=8, scatter_db=3, contact_s=.00035,
                   spread=.9, ring_db=-17, cycles=8)
    return from_db(.4) * room(knocks, wet_db=-6, early_db=-4.5, early_s=0.0045)


def claw_ticks():
    """Near-instant contact: dry, high, heavily damped ticks."""
    ticks = blows(CLAW_TICKS, CLAW_RESONANCES, focus_db=16.5, scatter_db=.6, contact_s=.00003,
                  spread=1.74, ring_db=-15, cycles=4.2)
    return from_db(4.6) * room(ticks, wet_db=-6, early_db=2.5, early_s=.0016)


def chatter(count=20):
    """Repeated impact: an uneven run of weakening touches on varied bars; rows t/s, peak level/dB, f/Hz."""
    rows = []
    for s, peak_db, centre_hz in PANEL_RATTLES:
        gaps = RATTLE_GAP_S * (.5 + rng.random(count))
        after = np.cumsum(gaps) - gaps[0]
        strong, high = rng.standard_normal((2, count))
        touch_db = peak_db - RATTLE_SAG_DB_PER_S * after + RATTLE_SCATTER_DB * strong
        rows += zip(s + after, touch_db, centre_hz * 2 ** (RATTLE_SPREAD_OCTAVES * high))
    return rows


def ringing_bars():
    """Lightly damped modes: nudged or rattling wire bars ring thinly."""
    pings = blows(BAR_NUDGES + chatter(), BAR_RESONANCES, focus_db=14, scatter_db=2.5,
                  contact_s=.0005, spread=1.86, ring_db=-11, cycles=36)
    return from_db(-3) * room(pings, wet_db=-4, early_db=-7, early_s=.004)


def corner_clinks():
    """Free modal decay: a hard object further off clinks amid strong reflections."""
    clinks = blows(CORNER_CLINKS, CLINK_RESONANCES, focus_db=0, scatter_db=1, contact_s=.0003,
                   spread=.6, ring_db=3, cycles=10)
    return room(clinks, wet_db=-4, early_db=-2.5, early_s=0.0036)


def wire_snaps():
    """Impulsive release: very short high modes, with the lows filtered out."""
    snaps = blows(WIRE_SNAPS, SNAP_RESONANCES, focus_db=0, scatter_db=1, contact_s=.00006,
                  spread=1.2, ring_db=4, cycles=6)
    low_cut = signal.butter(4, SNAP_LOW_CUT_HZ, "high", fs=SR, output="sos")
    snaps = signal.sosfilt(low_cut, snaps + 1e-18)
    return from_db(7) * room(snaps, wet_db=-10.5, early_db=-6, early_s=.0012)


def scene():
    """Superposition: the animal over the background; the cage favours one side or the other by pitch."""
    wire = claw_ticks() + ringing_bars() + wire_snaps()
    animal = scrabbling() + scratches_and_rustles() + floor_thuds() + tray_knocks()
    animal = animal + wire * left_right(NEAR_CORNER_PAN_DB) + corner_clinks()
    size = next_fast_len(N)
    lean = left_right(at_hz(CAGE_LEAN, bins(size)))
    animal = irfft(rfft(animal, size) * lean, size)[:, :N]
    return animal + background_hum_and_hiss() * from_db([[-.3], [.3]])


def record(dry):
    """Low-pass filtering: an elliptic filter cuts the top steeply."""
    return signal.sosfilt(signal.ellip(10, .1, 70, CUTOFF_HZ, fs=SR, output="sos"), dry)


dry = scene()
out = record(dry)
wav_out(out)
```